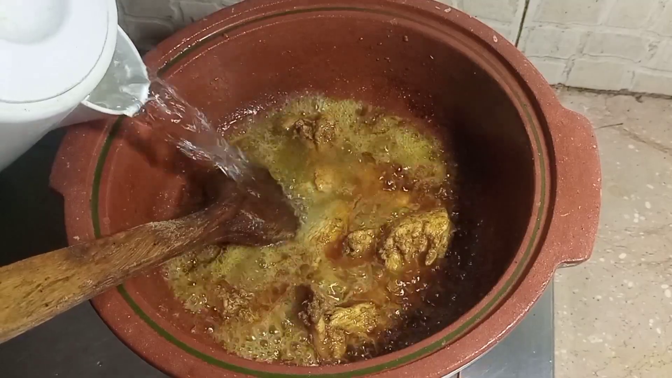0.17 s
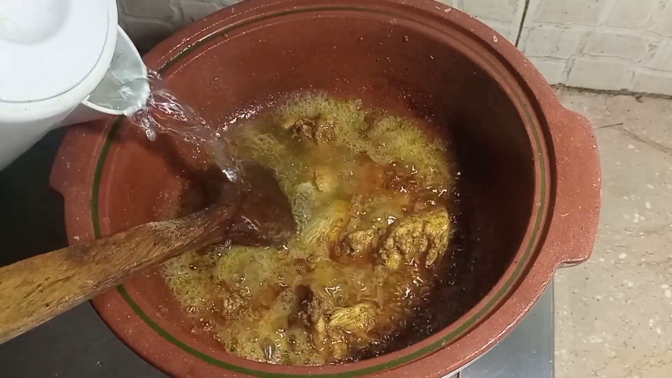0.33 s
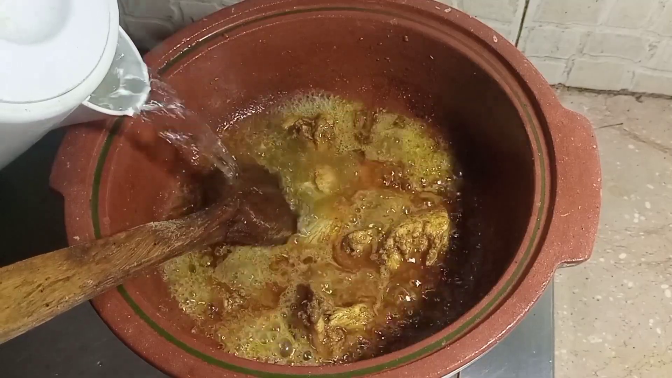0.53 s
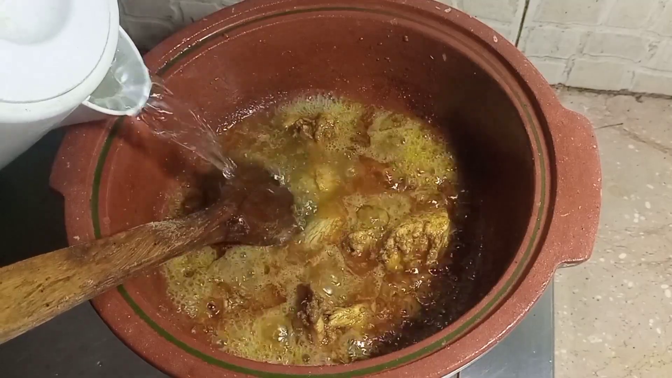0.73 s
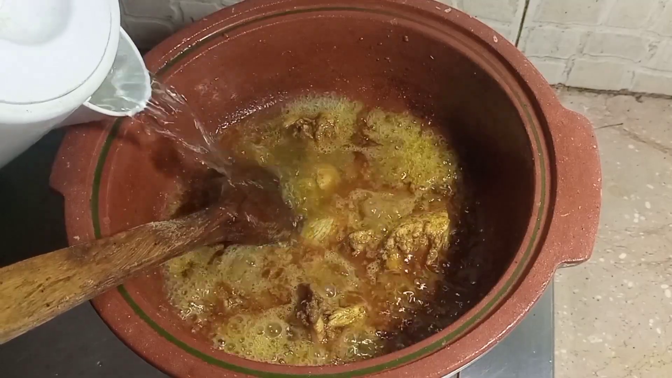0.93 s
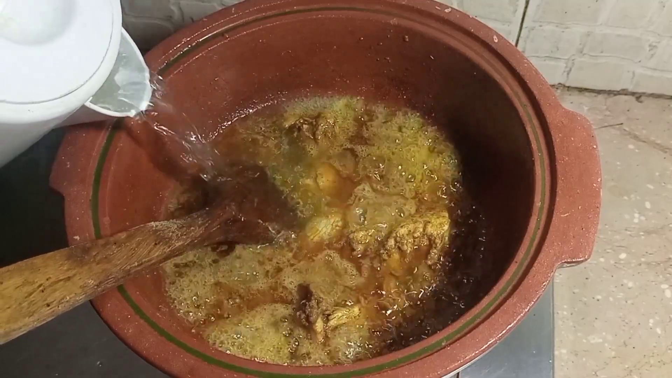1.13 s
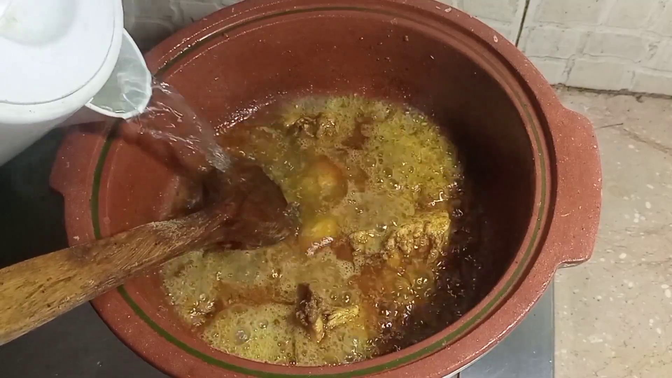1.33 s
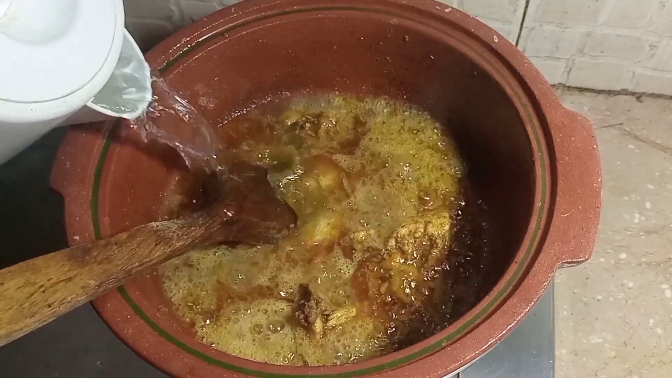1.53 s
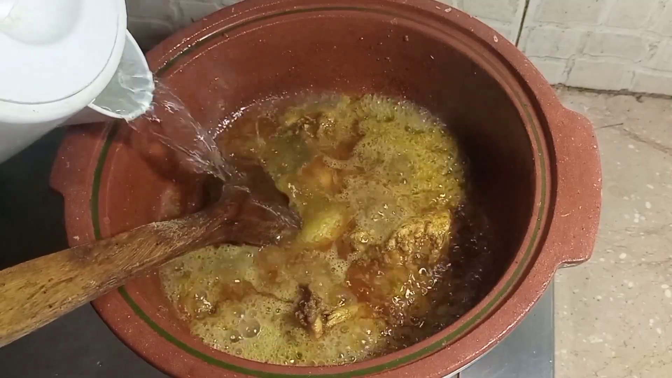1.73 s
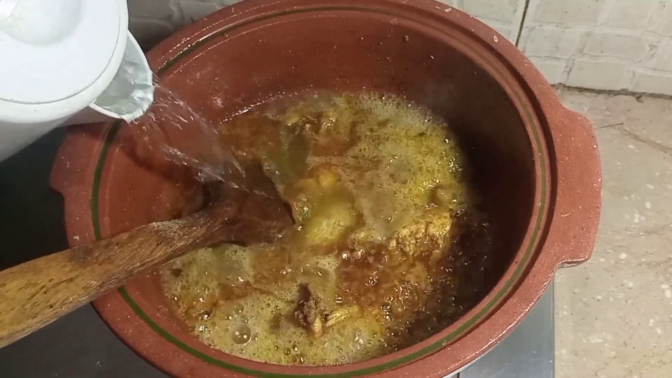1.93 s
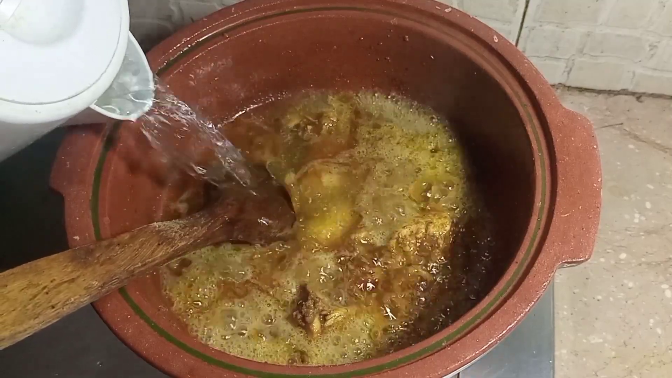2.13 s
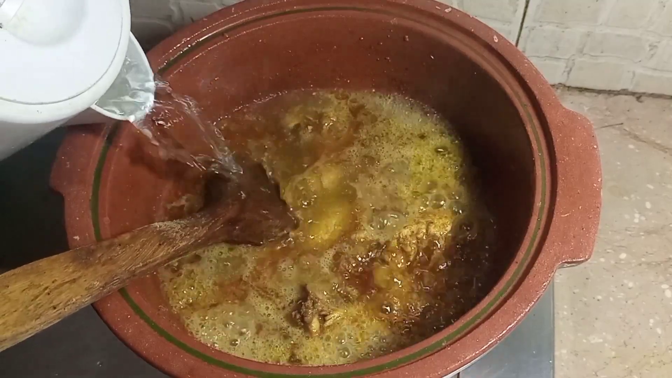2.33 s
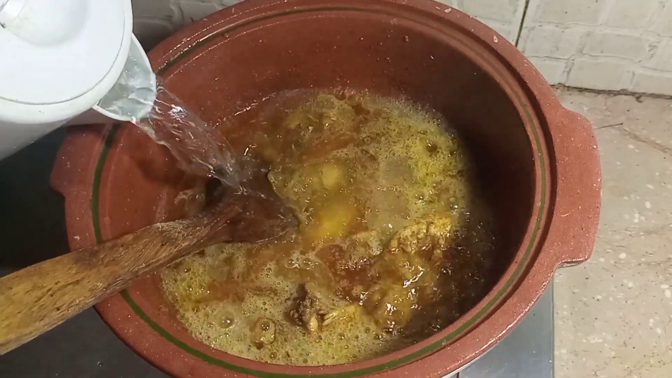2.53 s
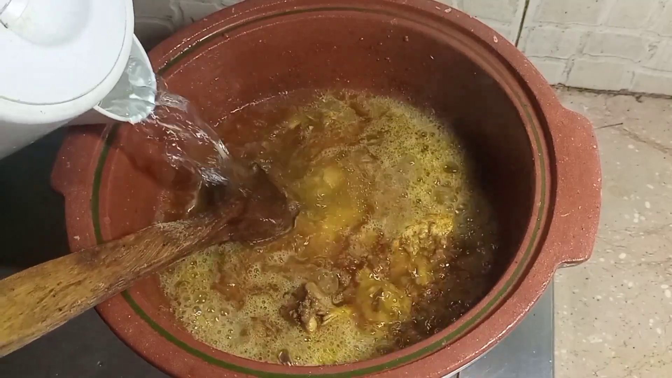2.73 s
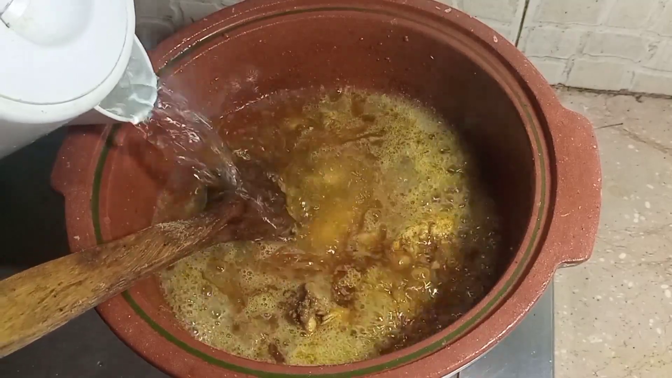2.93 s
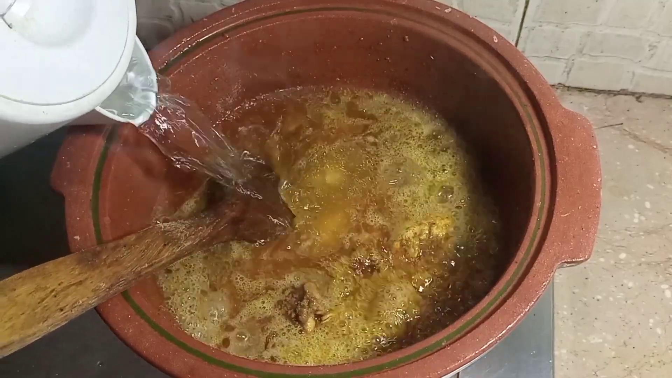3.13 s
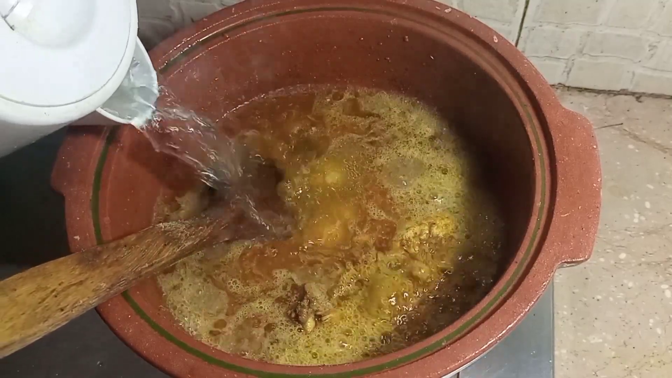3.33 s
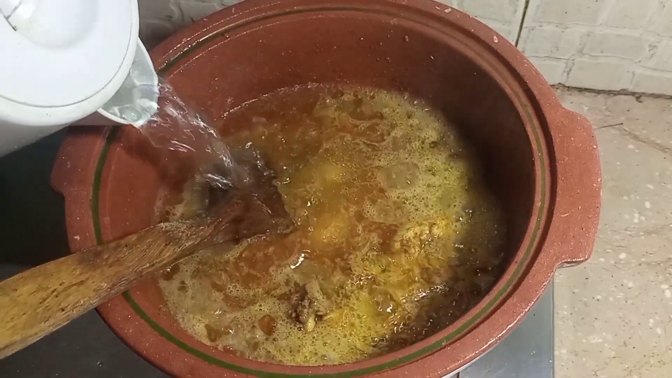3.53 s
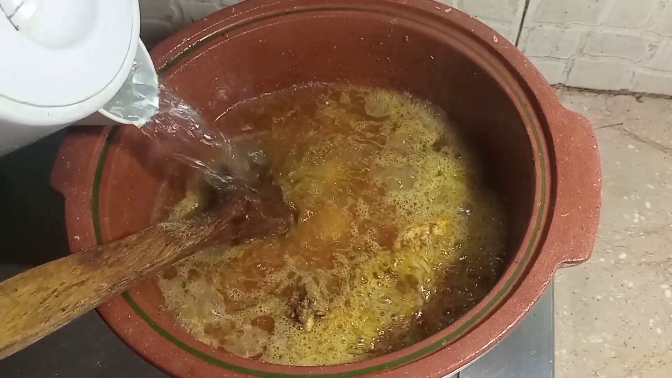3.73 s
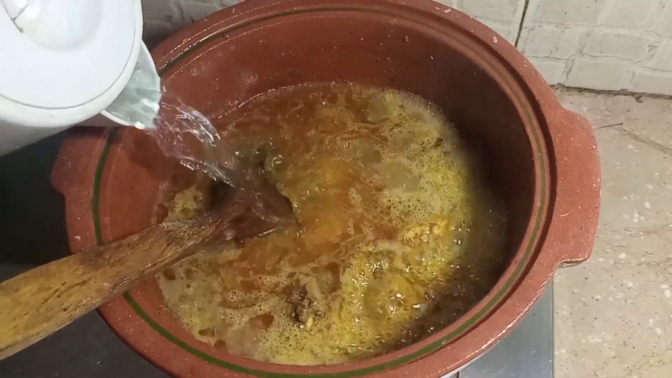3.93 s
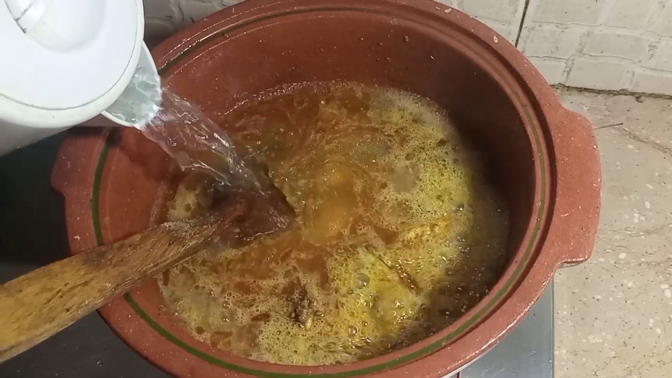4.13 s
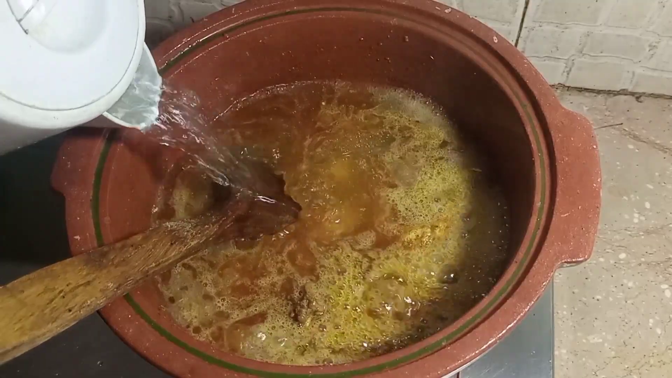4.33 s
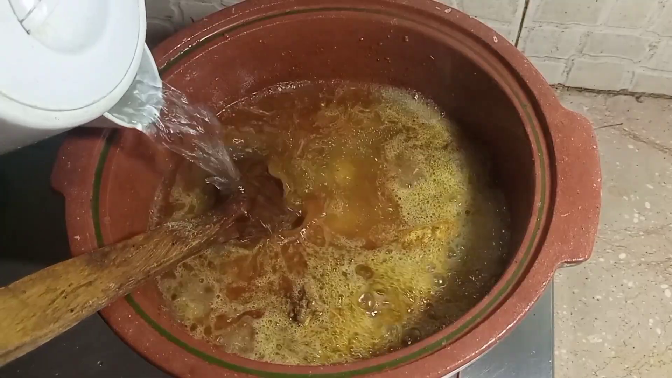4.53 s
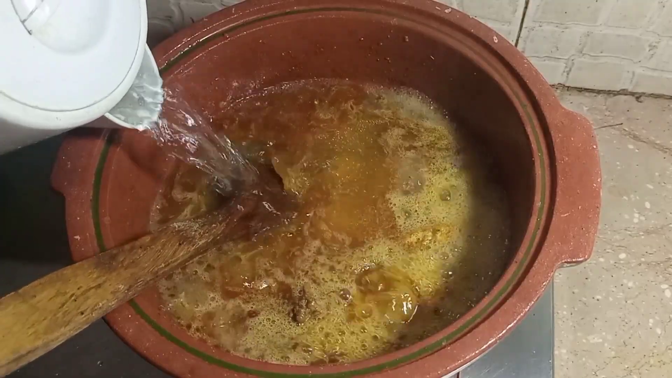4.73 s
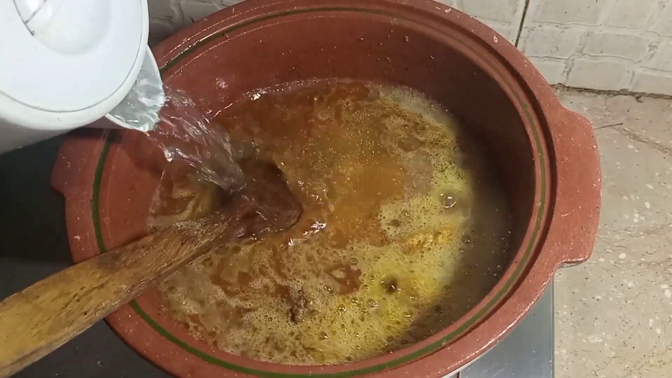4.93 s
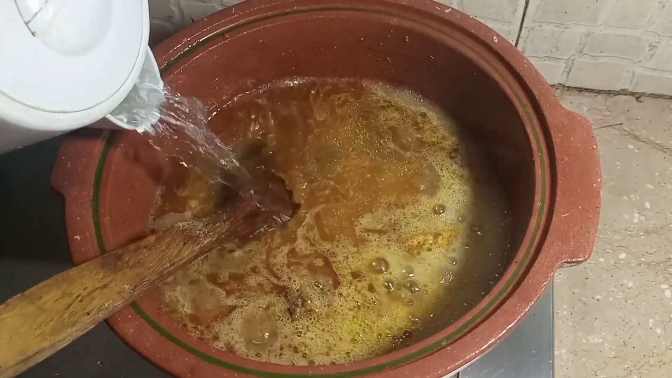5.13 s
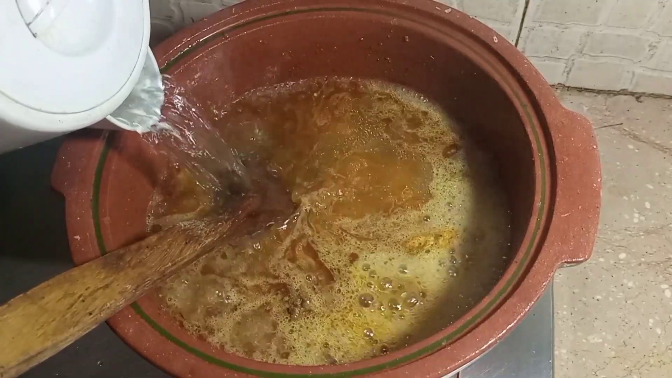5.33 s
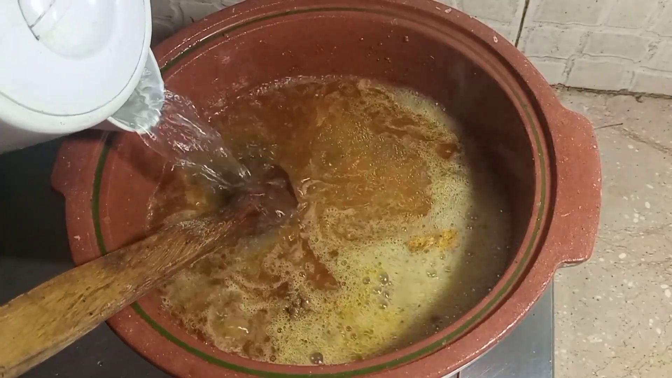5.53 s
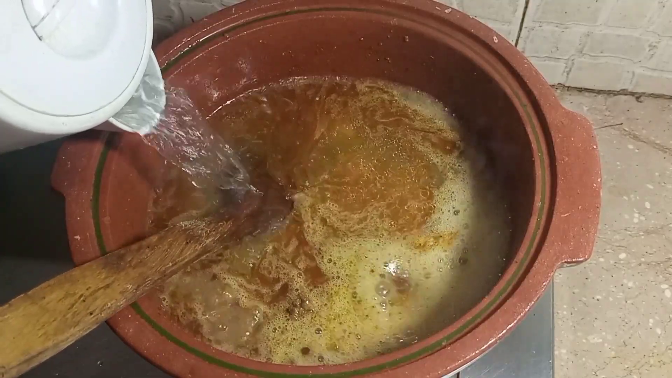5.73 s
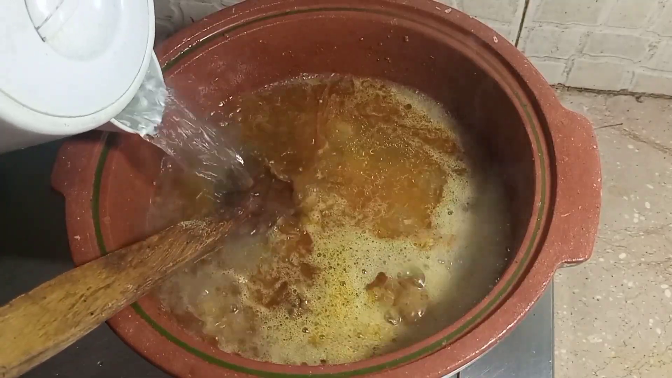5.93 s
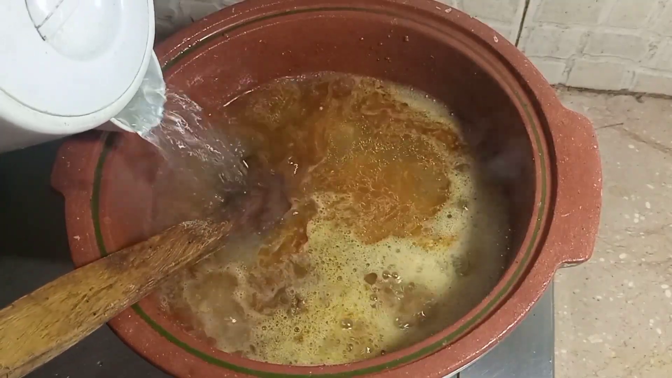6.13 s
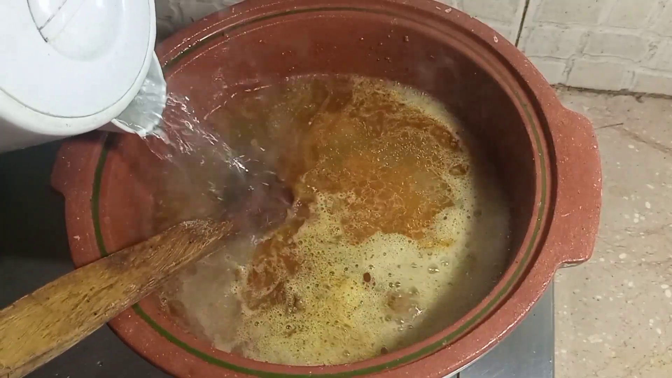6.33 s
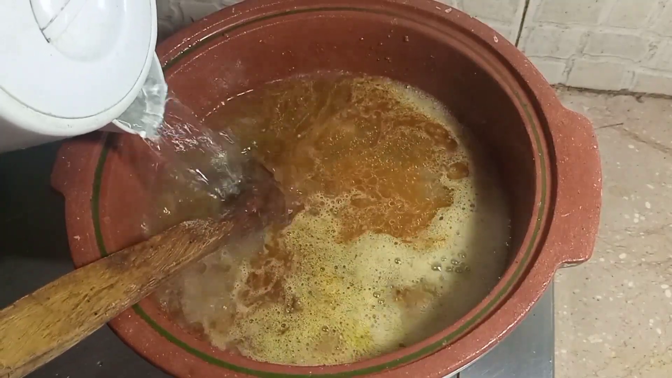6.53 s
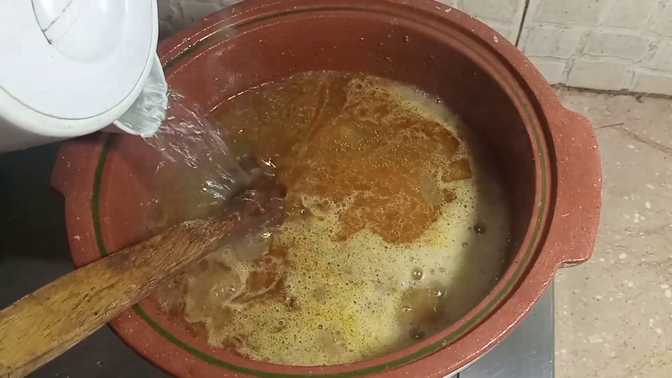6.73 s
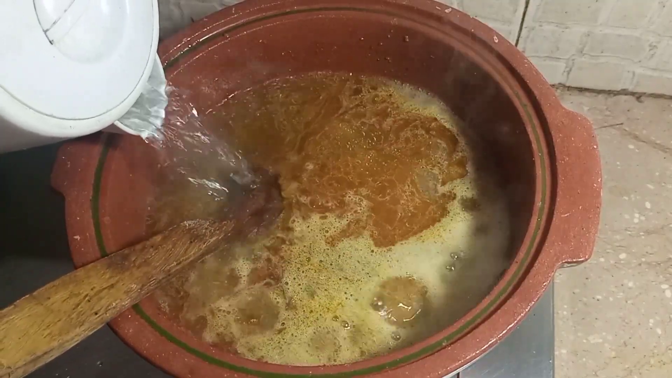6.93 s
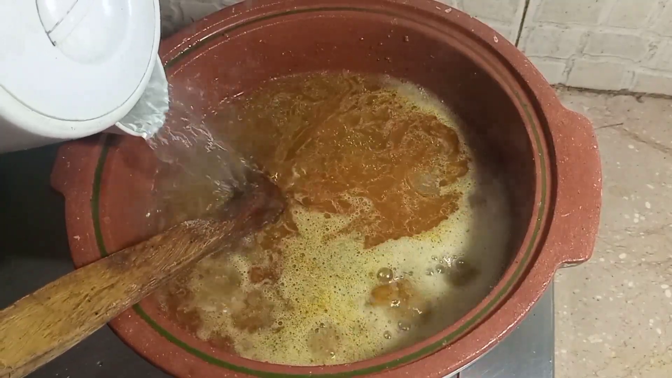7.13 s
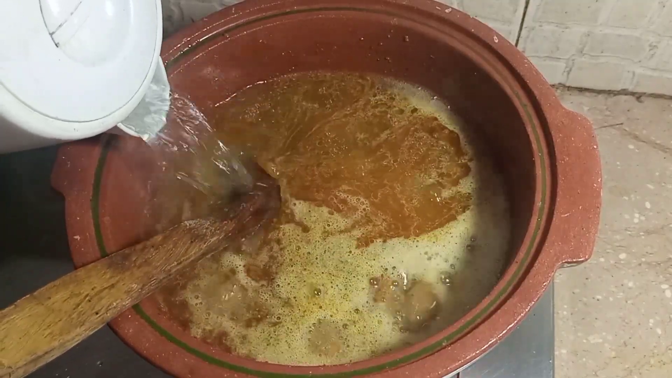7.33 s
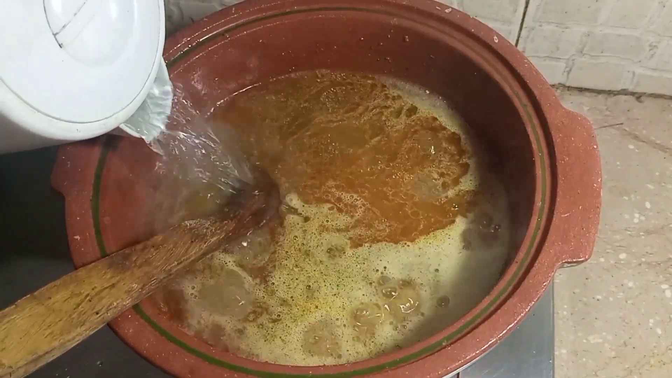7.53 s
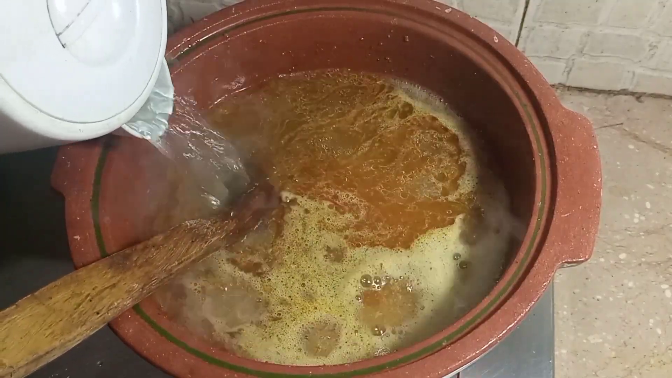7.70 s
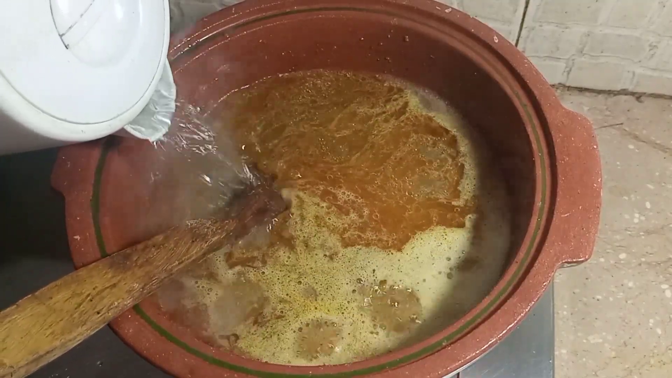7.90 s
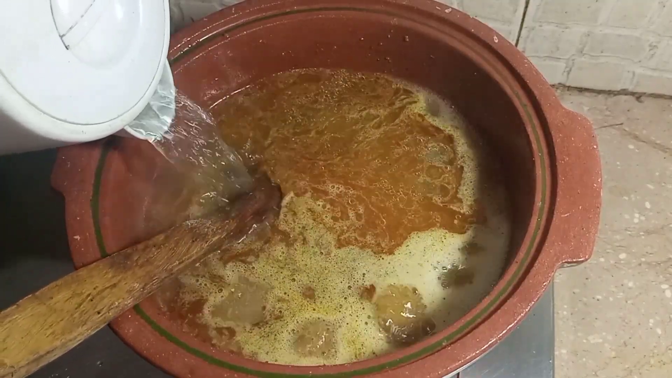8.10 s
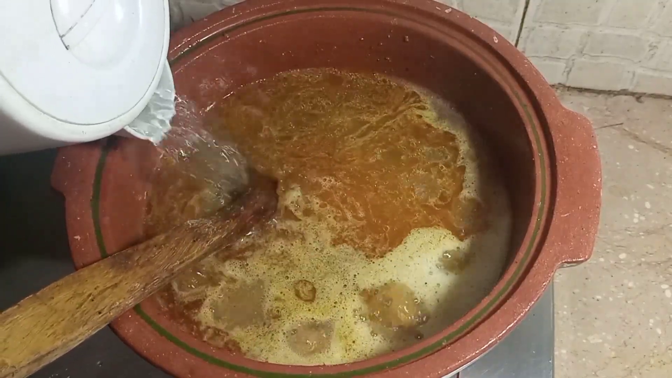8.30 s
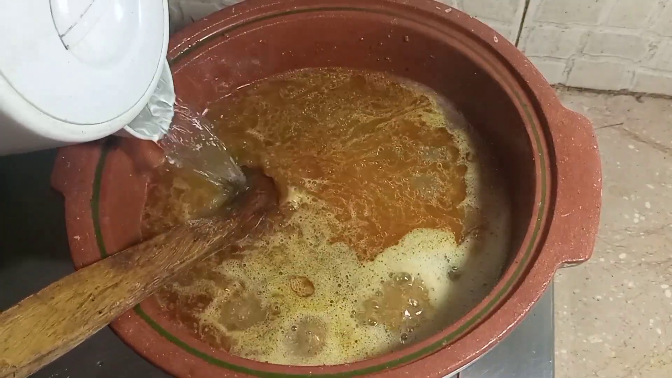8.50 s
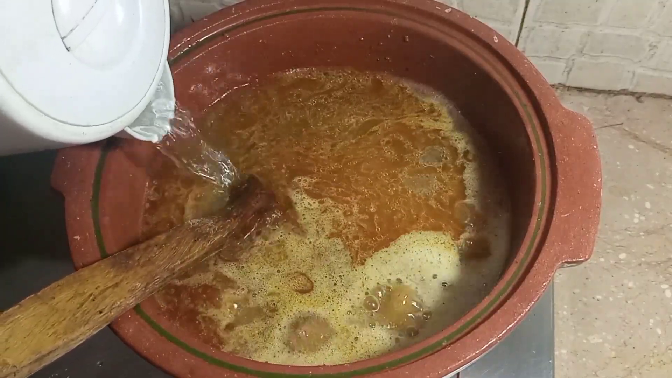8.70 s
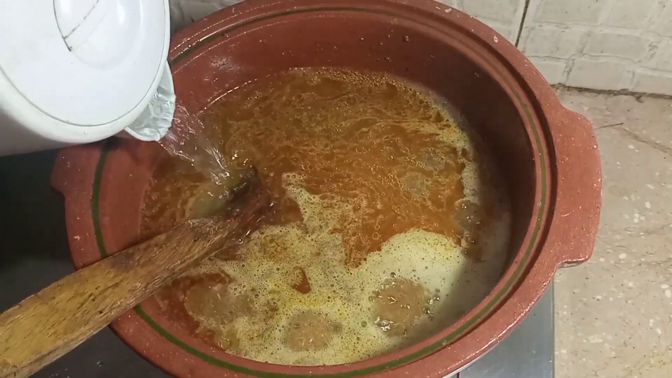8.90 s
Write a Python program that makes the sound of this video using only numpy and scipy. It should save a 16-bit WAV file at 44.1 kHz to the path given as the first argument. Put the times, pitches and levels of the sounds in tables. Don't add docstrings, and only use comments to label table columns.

```python
import sys
import numpy as np
from scipy import signal
from scipy.fft import rfft, irfft
from scipy.io import wavfile

SR = 44100
rng = np.random.default_rng(int(sys.argv[2]) if len(sys.argv) > 2 else 0)


def invert_db(x):
    u = np.asarray(x, float) / 20
    return 10 ** u


def persist_wave(psi):
    counts = np.round(np.clip(psi, -1, 1) * 32767).astype(np.int16)
    wavfile.write(sys.argv[1], SR, np.atleast_2d(counts).T)


N = 395116

# t/s, level/dB, big-bubble share/dB
SIZZLE = [(0, -45.5, -5.5), (.12, -48, -3.5), (.2, -44.5, -7), (.4, -46.5, -4.5), (1.05, -42, -6.5),
          (1.35, -42.5, -8), (1.9, -43.5, -5.5), (2.35, -43.5, -5), (2.75, -45, -4.5), (2.87, -41.5, -8.5),
          (3.12, -44, -7.5), (3.47, -41.5, -11), (4.05, -42, -14), (4.5, -47.5, -8.5), (5.0, -54.5, -4),
          (6.1, -56.5, -5.5), (7.5, -60, -3.5), (8.96, -62.5, -6.5)]
# f/Hz, level/dB
SIZZLE_COLOUR = [(900, -29), (1500, -12.5), (1900, -13.5), (2620, -10), (3700, -6.5), (5210, -5),
                 (6500, -0.5), (7500, -4), (10800, -14), (13700, -15), (14700, -2.5), (16000, 1)]
# t/s, added level/dB, length/s
SPRAY_GUSTS = [
    (.16, 8.5, 0.056),
    (1.0, -2, 0.14),
    (1.46, 3, 0.18),
    (1.78, 5, 0.093),
    (3.1, 0, 0.11),
    (4.35, 2.5, 0.95),
]


def sizzle():
    level_db, big_db = in_time(SIZZLE)
    big_db = big_db - big_db[:N // 2].mean()
    start_db, rise_s = -7, 0.23
    fine_db = start_db * np.exp(-np.arange(N) / SR / rise_s)
    fine_db = fine_db + 0.077 * big_db - drift(7.9)
    fine_db = fine_db + pushes(SPRAY_GUSTS, attack_s=0.022, size=float)

    def share_db(hz):
        big = np.clip((5000 - hz) / 1500, 0, 1)
        fine = np.clip((hz - 8000) / 2500, 0, 1)
        return big * big_db + fine * fine_db

    fizz = bubbles(np.geomspace(1500, 17000, 20), per_s=3000, spread_db=2.63, clump_db=2.5, q=3.82,
                   smooth=1.0, broad=0.3, gain_db=share_db)
    echoed = pot_echo(fizz * invert_db(sputter_db()), t60=0.053, wet_db=-8.5)
    return invert_db(level_db + 5.5) * coloured(echoed, SIZZLE_COLOUR)


def sputter_db():
    flares_per_s, flare_db, decay_s = 37, 0.85, 0.0064
    flares = rng.random(N) * (rng.random(N) < flares_per_s / SR)
    return flare_db * signal.lfilter([1], [1, -np.exp(-1 / (decay_s * SR))], flares + 1e-18)


# t/s, level/dB, largest-bubble share/dB
STREAM = [(0, -57.5, 0), (.8, -56.5, 1), (1.7, -57.5, 3), (2.8, -59, 2.5), (3.7, -60, 0.5),
          (4.45, -59.5, -3.5), (4.95, -63.5, -10), (5.35, -64.5, -3), (5.7, -66.5, -19), (6.15, -63.5, -1),
          (6.5, -68.5, -11), (6.75, -67, -5), (7.12, -66.5, -16), (7.55, -68.5, 0.5), (7.9, -71, -20),
          (8.25, -74, -14), (8.5, -72, -7), (8.96, -69.5, -5)]
# f/Hz, level/dB
GURGLE_COLOUR = [(220, -30), (380, -19.5), (446, -23.5), (533, -2), (592, -5), (652, 0.5), (800, -2.5),
                 (1140, -5), (1350, -2.5), (1900, -16), (2030, -9.5), (2200, -12), (2600, -10), (3380, -43),
                 (5720, -120)]


def stream():
    gurgle_db, large_db = in_time(STREAM)
    calm = np.clip((gurgle_db.max() - 5.5 - gurgle_db) / 12, 0, 1)

    def share_db(hz):
        return np.clip((800 - hz) / 160, 0, 1) * large_db + 1.7 * calm * drift(9.8)

    air = bubbles(np.geomspace(420, 2600, 15), per_s=700, spread_db=3.2, clump_db=2.0, q=7.5,
                  smooth=1.0 - .55 * calm, broad=.35, gain_db=share_db)
    air = coloured(pot_echo(air, t60=.06, wet_db=-12), GURGLE_COLOUR)
    dip_depth = 0.42 * calm
    air = air - dip_depth * resonance(air, hz=570, width=370)
    return invert_db(gurgle_db + 2.0) * air


# f/Hz, width/Hz, level/dB
POT_MODES = [(209, 22, -7), (264, 33.5, 14), (314, 68, -31)]
# f/Hz, width/Hz, level/dB
STAND_MODES = [(64, 57, -15), (117.6, 11, 0), (150, 30, -8), (182.6, 16, -3.5)]
# t/s, level/dB, length/s
SURGES = [(0.952, -60, 0.042), (1.719, -57, 0.062), (2.04, -68, 0.038), (2.42, -64, 0.086),
          (2.514, -51, 0.055), (2.626, -72, 0.05), (2.783, -64, 0.084), (2.995, -62, 0.1),
          (3.344, -50, 0.026), (3.58, -64, 0.05), (4.133, -62, 0.1), (4.773, -62, 0.074),
          (5.064, -51, 0.044), (5.3, -70, 0.044), (5.665, -70, 0.046), (5.788, -53, 0.034),
          (5.98, -55.5, 0.11), (6.37, -52.5, 0.032), (6.647, -61, 0.061), (6.801, -55.5, 0.023),
          (7.34, -59, 0.029), (8.359, -51, 0.078), (8.85, -65, 0.053)]
# t/s, level/dB, length/s
THUDS = [(0.287, -73, 0.05), (0.452, -57, 0.046), (0.627, -68, 0.056), (0.924, -62, 0.045),
         (1.447, -57, 0.093), (1.686, -79, 0.05), (1.81, -73, 0.043), (1.97, -71, 0.05), (2.07, -59, 0.034),
         (2.256, -64, 0.05), (2.33, -60, 0.05), (2.606, -59, 0.054), (2.766, -69, 0.065),
         (2.984, -75, 0.05), (3.736, -62, 0.089), (4.163, -66, 0.05), (4.774, -70, 0.05),
         (5.086, -60, 0.04), (5.39, -70, 0.056), (5.799, -64, 0.05), (5.991, -54, 0.03),
         (6.365, -63, 0.042), (6.65, -72, 0.042), (6.808, -61, 0.06)]


def drumming():
    covered_s, damping_db_per_s, settle_db_per_s = 1.5, -6.5, -1.0
    damping_db = damping_db_per_s * np.maximum(np.arange(N) / SR - covered_s, 0)
    settle_db = settle_db_per_s * (np.arange(N) - N / 2) / SR
    surge = invert_db(-11.0) * pushes(SURGES, attack_s=0.0024)
    wall_db = np.maximum(-67.5 + damping_db, -84.5 + settle_db) + 3.4 * drift(5.0)
    wall = shaken(POT_MODES, invert_db(wall_db) + surge)
    stand_db = np.maximum(-74 + damping_db, -86 + settle_db) + 2.4 * drift(6)
    jolts = invert_db(-8.5) * pushes(np.add(THUDS, [-.015, 0, 0]), attack_s=0.0034)
    stand = shaken(STAND_MODES, invert_db(stand_db) + invert_db(-24.0) * surge + jolts)
    return wall + stand


# t/s, level/dB, f/Hz
KNOCKS = [(0.025, -63, 260), (0.159, -62, 277), (0.221, -61, 278), (0.386, -63, 264), (0.466, -56, 270),
          (0.564, -57, 260), (0.656, -54, 288), (0.749, -59, 258), (0.84, -61, 255), (0.886, -62, 269),
          (0.98, -53, 260), (1.126, -56, 258), (1.278, -57, 283), (1.345, -58, 270), (1.434, -57, 250),
          (1.478, -53, 260), (1.52, -60, 287), (1.574, -56, 256), (1.615, -51, 256), (1.731, -54, 264),
          (1.773, -55, 265), (1.815, -62, 245), (1.862, -54, 262), (1.936, -53, 261), (2.02, -57, 247),
          (2.061, -56, 262), (2.12, -65, 240), (2.286, -58, 250), (2.427, -54.5, 250), (2.488, -51, 269),
          (2.691, -60, 262), (2.783, -63, 310), (2.817, -63, 260), (2.876, -63, 264), (3.074, -60, 253),
          (3.257, -60, 248), (3.335, -60, 270), (3.375, -59, 272), (3.882, -71, 250), (4.129, -64, 287),
          (2.326, -62, 479), (2.408, -68, 312), (2.483, -72, 312), (2.584, -61, 482), (2.647, -75, 320),
          (2.754, -71, 355), (2.857, -65, 345), (2.946, -71, 479), (3.06, -68, 312), (3.124, -73, 479),
          (3.2, -65, 479), (3.593, -67, 471), (3.676, -75, 458), (3.881, -69, 336), (3.959, -74, 460),
          (4.058, -71, 315), (4.309, -79, 479), (4.909, -80, 423), (5.067, -63, 410), (5.392, -75, 474),
          (5.8, -67, 410), (5.99, -70, 404), (6.374, -72, 310), (6.654, -69, 483), (6.808, -71, 312),
          (7.34, -73, 468),
          (2.599, -56, 180), (2.815, -70, 177), (2.987, -74, 205), (3.065, -65, 229), (3.251, -75, 229),
         (3.608, -75, 215), (3.733, -70, 132), (3.826, -72, 148), (3.924, -73, 151), (4.142, -74, 215),
         (4.491, -73, 151), (4.769, -76, 132), (4.817, -69, 132), (5.088, -61, 175), (5.799, -66, 189),
         (5.991, -64, 187), (6.373, -59, 130), (6.652, -69, 132), (6.806, -68, 186), (6.929, -80, 145),
         (8.631, -69, 202), (8.864, -78, 229)]


def knocks():
    swell_s, decay_s = 0.0069, 0.023
    out, t = np.zeros(N + SR), np.arange(SR // 5) / SR
    envelope = np.minimum(t / swell_s, 1) * np.exp(-t / decay_s)
    for s, db, hz in KNOCKS:
        out[round(s * SR):][:len(t)] += invert_db(db + 2.0) * envelope * np.sin(2 * np.pi * hz * t)
    return out[:N]


# t/s, level/dB, f/Hz
CRACKLES = [(0.0568, -41, 3430), (0.1315, -31, 4740), (0.3311, -32, 4720), (0.3805, -50, 4800),
            (0.381, -25.5, 4100), (0.4299, -34, 3700), (0.5327, -29, 4700), (0.6924, -27, 4660),
            (0.7267, -27.5, 4770), (0.858, -32, 3740), (1.1493, -37, 3200), (1.242, -36, 4120),
            (1.301, -28.5, 4200), (1.8093, -36, 4430), (1.8407, -37, 4460), (1.933, -30, 4270),
            (2.0063, -31, 4200), (2.0522, -33, 4660), (2.097, -32, 4240), (2.1197, -31, 3920),
            (2.1854, -33, 3820), (2.3835, -45, 3780), (2.6998, -36, 3800), (2.7581, -37, 4550),
            (3.3677, -32, 3940), (3.5996, -31, 4360), (3.9434, -35, 4000), (4.0307, -45, 4400),
            (4.414, -37, 3760), (4.5364, -39, 3160)]
# t/s, level/dB, f/Hz
POPS = [ (0.138, -31, 6700), (0.168, -27.5, 5360),  (0.4025, -32, 5100), (0.506, -32, 6710),
         (0.617, -28, 7000), (0.6789, -28, 6400), (0.7275, -23, 5800), (1.0433, -30, 6600),
        (1.6841, -21.5, 6760), (2.153, -29, 6290), (2.3755, -29, 7040),  (2.8614, -30, 6260),
        (3.4695, -20.5, 6660), (4.082, -34, 6900), (4.415, -30, 5900), (5.5525, -41, 7030),
        (5.672, -39, 7200), (6.4028, -38, 7480), (6.4677, -39, 7260),  (6.9134, -34, 6320),
        (7.1681, -39, 7020), (7.3459, -39, 6240), (7.3756, -39, 7190),  (7.5443, -33.5, 6900),
        (7.591, -41, 6760), (7.9009, -32.5, 6560), (8.0905, -44, 5820), (8.4677, -40, 6800),
        (8.7281, -44, 5660), (8.8483, -34.5, 6740)]
# t/s, level/dB, f/Hz
TICKS = [(5.5127, -42, 15400), (5.5421, -43, 15200), (5.6997, -41, 15300), (6.1991, -37, 14700),
         (6.3747, -38, 15400), (6.6431, -47, 14800), (6.688, -42, 14900), (6.8776, -40, 15100),
         (7.3455, -31.5, 10400), (7.4049, -51, 14800), (7.4932, -42, 14700), (7.6034, -44, 14700),
         (8.0903, -39, 15300), (8.8486, -38, 15000)]
# t/s, level/dB, f/Hz
SPARKS = [(5.2768, -47, 8680), (5.5133, -47, 8520), (5.6719, -46, 9060), (5.9133, -46, 9390),
          (6.1987, -42, 9050), (6.3748, -50, 8500), (6.4691, -51, 8560), (6.6886, -46, 8560),
          (6.7569, -50, 8710), (6.8777, -47, 8570), (7.0198, -52, 8600), (7.3456, -39, 10200),
          (7.4918, -50, 8540), (7.605, -50, 9800), (7.822, -43, 9560), (7.9008, -58, 8630),
          (8.0495, -53, 8990), (8.0904, -45, 9510), (8.1348, -54, 9040), (8.2475, -45, 9380),
          (8.3333, -44, 8900), (8.8496, -47, 9100), (8.9011, -58, 9040), (8.9415, -56, 9750)]
# t/s, level/dB, f/Hz
SNAPS = [(4.8397, -40.5, 1130), (7.6035, -36.5, 3700), (5.0692, -45, 1060), (5.1715, -40, 3730),
         (5.2762, -44, 3160), (5.3037, -44, 1170), (5.4314, -48, 1550), (5.5127, -39, 3800),
         (5.7003, -41, 3700), (5.7537, -39.5, 1010), (6.1413, -40, 3780), (6.1632, -39, 3280),
         (6.4695, -38, 3270),  (6.5294, -37.5, 3560), (6.6586, -35, 3580),  (6.7589, -41, 2120),
         (6.8606, -39, 2270), (6.945, -37, 3260), (7.0806, -48, 3670), (7.1679, -45, 1220),
         (7.1834, -39, 2900), (7.2937, -42, 2470), (7.3455, -42, 3140),  (7.4927, -47, 1550),
         (7.59, -38, 3220),  (7.7202, -42.5, 2070), (7.9467, -40.5, 3810), (8.011, -46, 1570),
         (8.4775, -47.5, 1570),  (8.8481, -40, 2620),
         (6.6358, -45, 3760), (6.7774, -45, 3610), (6.8894, -44, 2750), (7.2735, -50, 1410),
          (7.3094, -45, 2660), (7.5223, -46, 3170), (7.6879, -50, 3750), (7.739, -45, 1580),
          (7.7744, -46, 2110), (7.787, -51, 2330), (7.8214, -57, 4470), (7.8644, -59, 2000),
          (8.091, -49, 3750), (8.1279, -50, 3040), (8.1983, -55, 3840), (8.3335, -47, 4330),
          (8.3998, -54, 3810), (8.6274, -44, 4360), (8.6927, -52, 1550), (8.7494, -54, 1750)]


def spits():
    dry_spits = bursts(CRACKLES, cycles=30.0, rise=.005, crack_db=-12, low_hz=900, late_s=.0006)
    dry_spits += bursts(POPS, cycles=34.0, rise=.002, crack_db=-15, low_hz=2000, late_s=.0007)
    dry_spits += bursts([*TICKS, *SPARKS], cycles=20.0, rise=.001, crack_db=-3, low_hz=3000, late_s=.0005)
    foam = [*SNAPS, *skins()]
    dry_spits += bursts(foam, cycles=11.0, rise=.012, crack_db=-7, low_hz=700, late_s=.0007)
    return pot_echo(dry_spits, t60=.05, wet_db=-2)


def skins():
    from_s, until_s, per_s, over_db, spread_db = 5, 6.6, 14, 9, 2
    when, size, pitch = rng.random((60, 3)).T
    s = from_s + np.cumsum(-np.log(when)) / per_s
    sizzle_db = np.interp(s, *np.transpose(SIZZLE)[:2])
    db = sizzle_db + over_db - spread_db * np.log(1 / size)
    return [row for row in zip(s, db, 1100 * 4 ** pitch) if row[0] < until_s]


# t/s, level/dB, f/Hz
PLOPS = [ (0.304, -38.5, 756),  (0.837, -35, 1980), (0.959, -35, 1340), (1.372, -37, 1330),
          (1.572, -36.5, 780), (1.597, -39, 805),  (2.428, -38, 740), (2.517, -35, 710),
         (2.977, -37.5, 660),  (3.071, -42, 766), (3.342, -42, 720), (4.059, -42.5, 754),
         (4.194, -38, 1430),  (4.382, -40, 1250), (4.841, -44, 766),  (5.304, -38, 730), (5.756, -52, 950),
         (5.944, -42.5, 860), (6.186, -45, 930), (6.32, -39.5, 990), (6.665, -47, 1010), (6.725, -42, 930),
         (6.959, -41, 1520), (7.203, -46, 810), (7.228, -45, 1240), (7.344, -42.5, 770), (7.404, -46, 1290),
         (7.457, -43, 810), (8.5, -49, 1230), (8.848, -44, 1550)]
# t/s, level/dB, f/Hz
BLIPS = [(6.688, -55, 751), (6.775, -58, 969), (7.027, -63, 824), (7.081, -53, 1230), (7.11, -61, 813),
         (7.168, -55, 1240), (7.493, -51, 799), (7.514, -55, 834), (7.544, -57, 826), (7.576, -55, 775),
         (7.597, -57, 760), (7.733, -57, 790), (7.769, -56, 780), (7.814, -62, 732), (7.849, -61, 770),
         (7.898, -64, 794), (7.946, -58, 810), (8.148, -54, 1140), (8.602, -63, 1250), (8.694, -60, 1160),
         (8.927, -60, 759), (8.954, -59, 904)]


def plops():
    big = bursts(PLOPS, cycles=10.0, rise=.015, crack_db=-4, low_hz=520, late_s=.0013)
    small = bursts(BLIPS, cycles=18.0, rise=.004, crack_db=-6, low_hz=520, late_s=.001)
    return pot_echo(big + small, t60=.07, wet_db=-6)


def rim(x):
    lifted = x + invert_db(-1.3) * resonance(x, hz=2005, width=31)
    return lifted - 0.67 * resonance(lifted, hz=2190, width=79)


# t/s, f/Hz, level/dB
GLUG = [(8.292, 264, -68), (8.305, 250, -58), (8.33, 233, -54), (8.36, 229, -63), (8.40, 218, -65),
        (8.45, 215, -77), (8.5, 214, -80)]


def glug():
    return tone(GLUG, fade_s=0.0056, wobble=0.0072)


# t/s, f/Hz, level/dB
HORN = [
    [(3.2, 378, -77), (3.24, 388, -73), (3.45, 397, -103)],
    [(8.33, 394, -84), (8.48, 400, -67.5), (8.676, 389, -69.5), (8.73, 395, -99)],
]


def horn():
    return sum(tone(rows, fade_s=0.01, wobble=0.002) for rows in HORN)


# f/Hz, level/dB
HUSH_COLOUR = [(12, -45), (20, -4), (259, 2), (478, -57), (746, -19), (1540, 17), (2840, -13.5), (6910, -9),
               (12800, -57), (15500, -0.5)]


def hush():
    return invert_db(-77.5) * coloured(rng.standard_normal(N), HUSH_COLOUR)


def bubbles(pitches, per_s, spread_db, clump_db, q, smooth, broad, gain_db):
    sizes = invert_db(spread_db * np.minimum(rng.exponential(1, N), 4.5)) * rng.choice([-1, 1], N)
    clumps_db = clump_db * (drift(9) + .7 * drift(30))
    born = rng.random(N) < per_s * invert_db(clumps_db) / SR
    dealt = rng.integers(0, len(pitches) + 2, N)
    hiss = rng.standard_normal((2, N))
    clicks = rms_one(sizes * born) * np.sqrt(len(pitches))
    common = broad * clicks * (dealt >= len(pitches)) + smooth * hiss
    out = np.zeros(N)
    for k, hz in enumerate(pitches):
        ringing = resonance(clicks * (dealt == k) + common[k % 2], hz, hz / q)
        out += invert_db(gain_db(hz) + 1.53 * drift(18.4)) * ringing
    return out


def bursts(rows, cycles, rise, crack_db, low_hz, late_s):
    swell_s, crack_s = .00022, .0004
    out, t = np.zeros(N + 2048), np.arange(2048) / SR
    for (s, db, hz), noise in zip(rows, rng.standard_normal((len(rows), len(t)))):
        envelope = invert_db(-60 * t * hz / cycles) * np.minimum(t / swell_s, 1)
        ring = 1.2 * envelope * np.sin(2 * np.pi * hz * t * (1 + rise * hz * t))
        crack = invert_db(crack_db) * (np.sign(noise) + .4 * noise) * np.exp(-t / crack_s)
        out[round((s + late_s) * SR):][:len(t)] += invert_db(db) * (ring + crack)
    return signal.sosfilt(signal.butter(4, low_hz, "high", fs=SR, output="sos"), out[:N])


def pot_echo(x, t60, wet_db):
    t = np.arange(int(.08 * SR)) / SR
    tail = rms_one(rng.standard_normal(len(t))) * invert_db(-60 * t / t60) * (t > .002)
    return x + invert_db(wet_db) * signal.oaconvolve(x, tail / np.sqrt(t60 * SR / 14))[:N]


def shaken(modes, push):
    def body(x):
        return sum((-1) ** k * invert_db(db) * resonance(x, hz, w) for k, (hz, w, db) in enumerate(modes))

    noise = rng.standard_normal(N)
    return body(push * noise) / np.std(body(noise))


def pushes(rows, attack_s, size=invert_db):
    t, out = np.arange(SR) / SR, np.zeros(N + SR)
    for s, db, length in rows:
        envelope = np.minimum(t / attack_s, 1) * np.exp(-(t / length) ** 2)
        out[round(s * SR):][:len(t)] += size(db) * envelope
    return out[:N]


def tone(rows, fade_s, wobble):
    hz, db = in_time(rows)
    t = np.arange(N) / SR
    gate = np.clip(np.minimum(t - rows[0][0], rows[-1][0] - t) / fade_s, 0, 1)
    phase = 2 * np.pi * np.cumsum(hz * (1 + wobble * drift(25))) / SR
    return np.sqrt(2) * gate * invert_db(db) * np.sin(phase)


def resonance(x, hz, width):
    r = np.exp(-np.pi * width / SR)
    zeros = np.array([1, 0, -1]) * (1 - r * r) / 2
    poles = [1, -2 * r * np.cos(2 * np.pi * hz / SR), r * r]
    return signal.lfilter(zeros, poles, x)


def coloured(x, points):
    hz, db = np.transpose(points)
    grid = np.fft.rfftfreq(8192, 1 / SR) + 1
    cepstrum = irfft(np.log(invert_db(np.interp(np.log(grid), np.log(hz), db))))
    cepstrum[1:4096] *= 2
    response = irfft(np.exp(rfft(cepstrum[:4097], 8192)))
    return rms_one(signal.oaconvolve(x, response)[:N])


def drift(rate):
    r = np.exp(-80 * np.pi * rate / SR)
    slow = signal.lfilter([1], [1, -2 * r, r * r], rng.standard_normal(N // 40 + 2002))[2000:]
    return np.interp(np.arange(N) / 40, np.arange(len(slow)), rms_one(slow))


def in_time(rows):
    s, *columns = np.transpose(rows)
    return [np.interp(np.arange(N) / SR, s, c) for c in columns]


def rms_one(x):
    return x / np.sqrt(np.mean(x ** 2) + 1e-20)


def scene():
    pot = sizzle() + stream() + drumming() + knocks() + spits() + plops()
    return (rim(pot) + glug() + horn() + hush())[None]


def top_cut(x):
    return signal.sosfilt(signal.butter(12, 16860, fs=SR, output="sos"), x)


def record(dry):
    lowpass = signal.ellip(12, .5, 70, 15600, fs=SR, output="sos")
    mix = signal.sosfilt(lowpass, dry)
    return top_cut(mix)


dry = scene()
out = record(dry)
persist_wave(out)
```